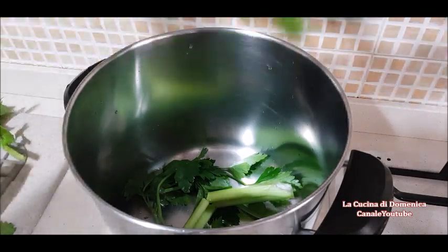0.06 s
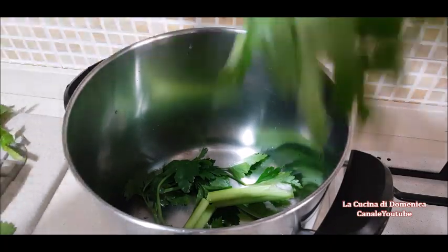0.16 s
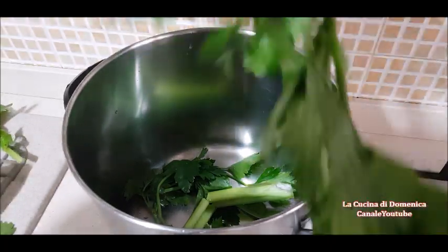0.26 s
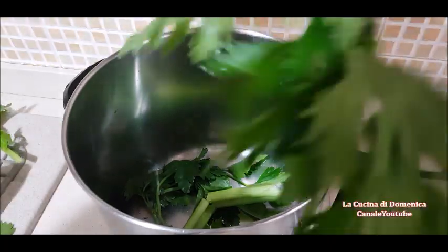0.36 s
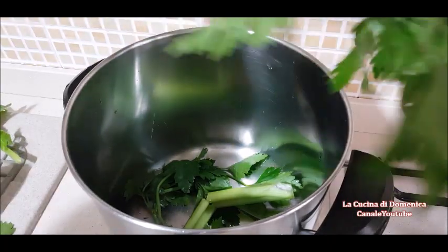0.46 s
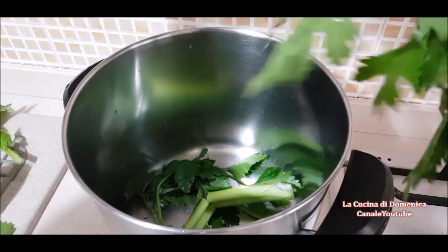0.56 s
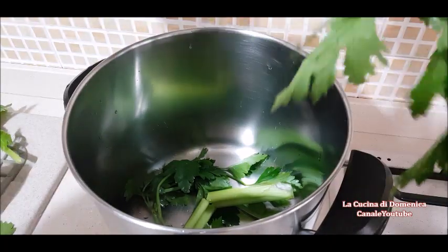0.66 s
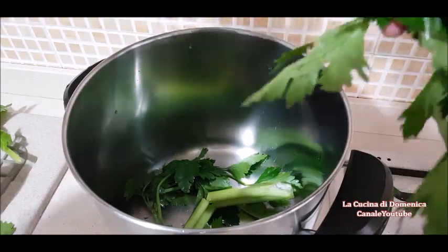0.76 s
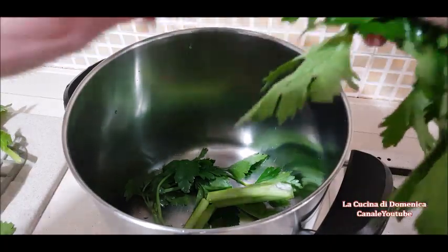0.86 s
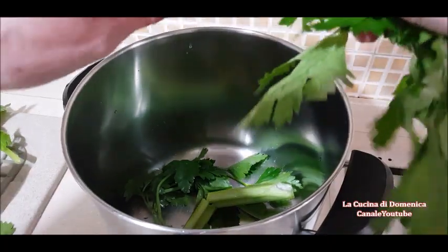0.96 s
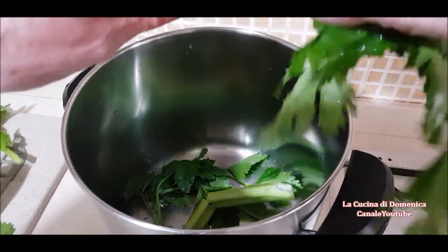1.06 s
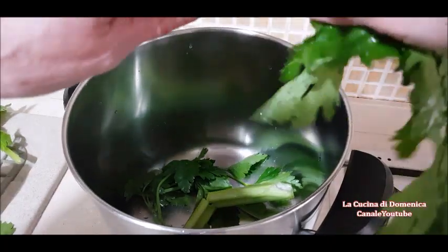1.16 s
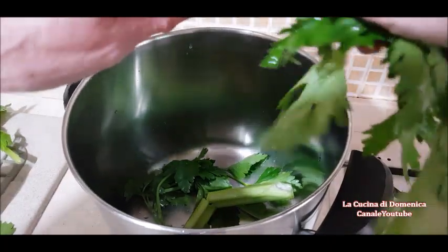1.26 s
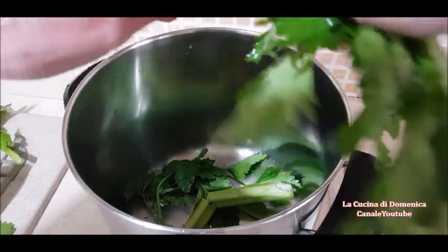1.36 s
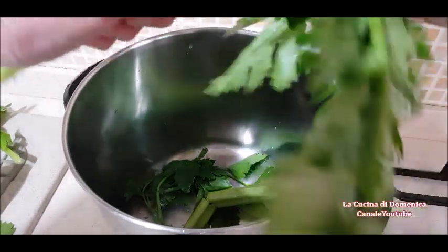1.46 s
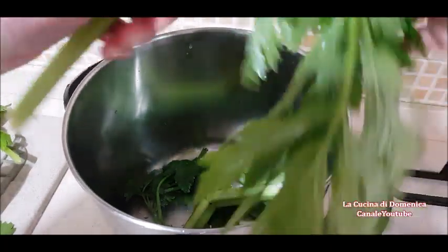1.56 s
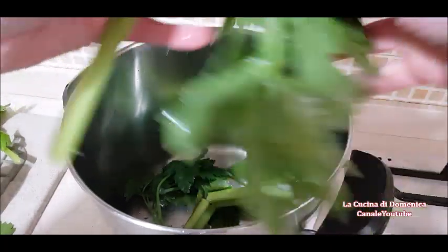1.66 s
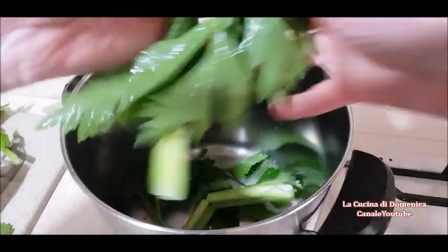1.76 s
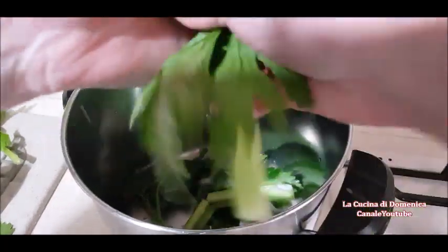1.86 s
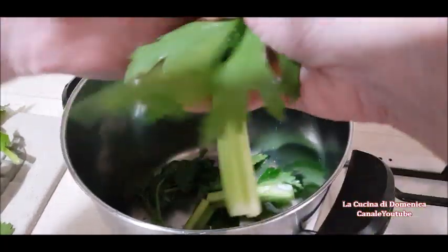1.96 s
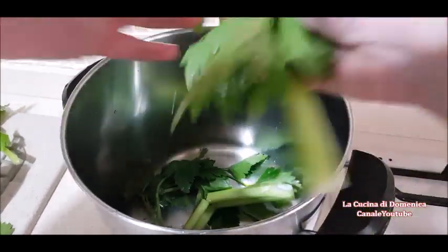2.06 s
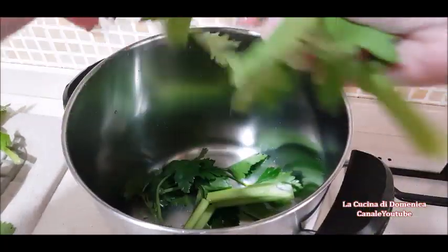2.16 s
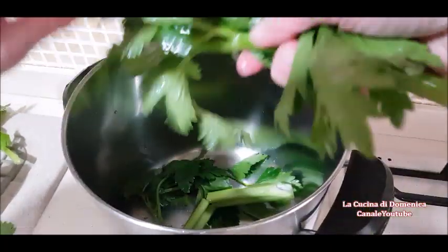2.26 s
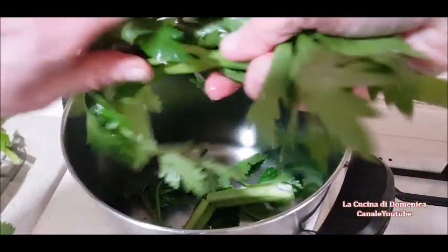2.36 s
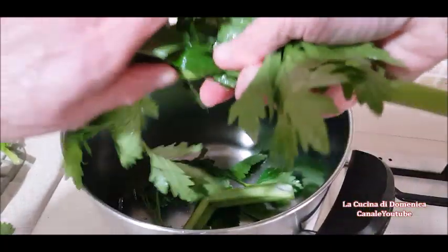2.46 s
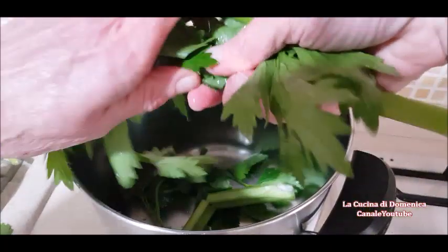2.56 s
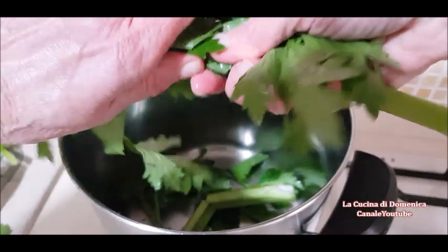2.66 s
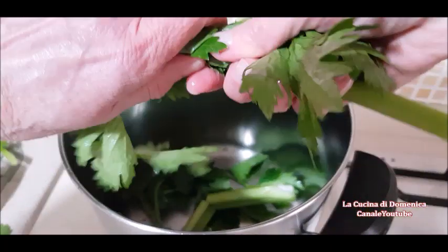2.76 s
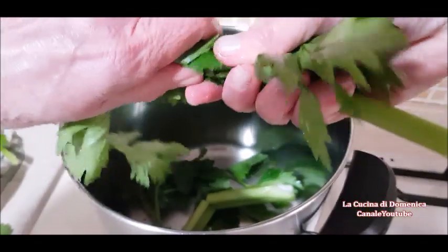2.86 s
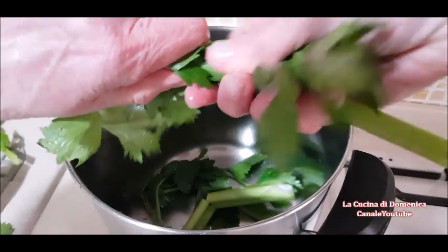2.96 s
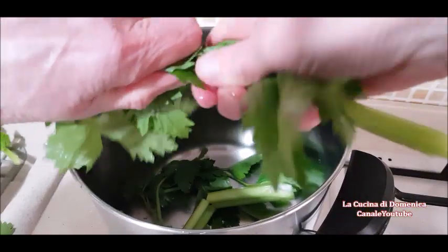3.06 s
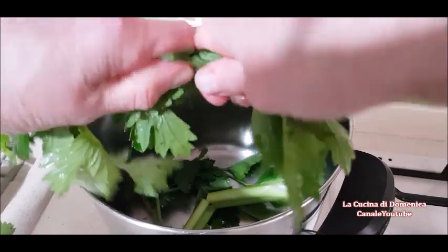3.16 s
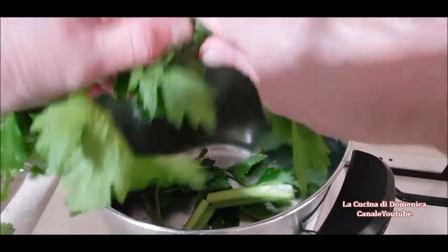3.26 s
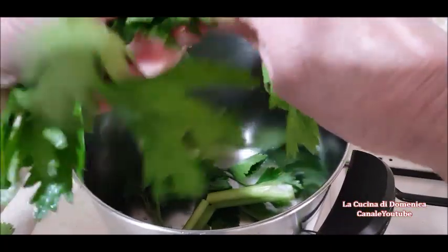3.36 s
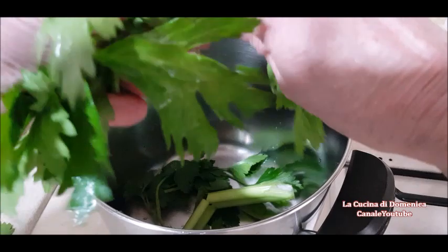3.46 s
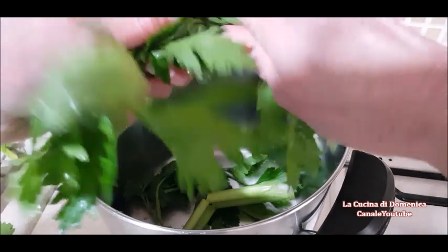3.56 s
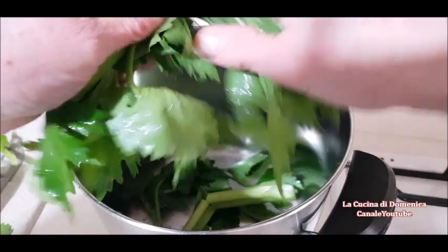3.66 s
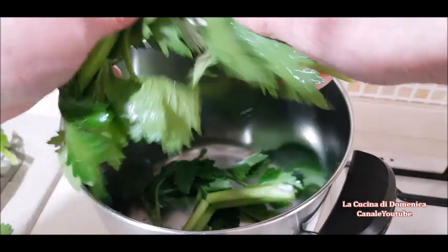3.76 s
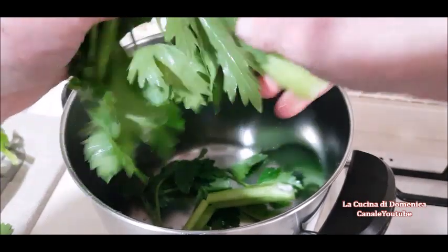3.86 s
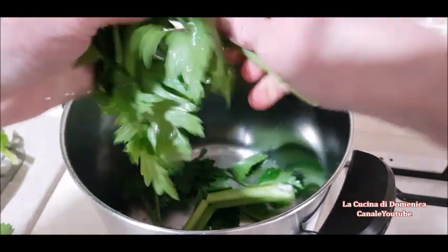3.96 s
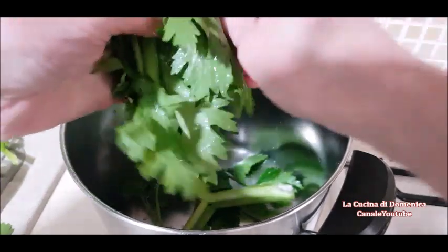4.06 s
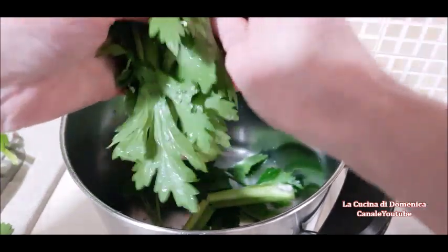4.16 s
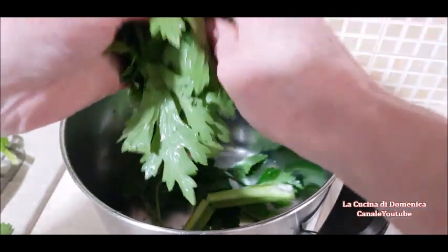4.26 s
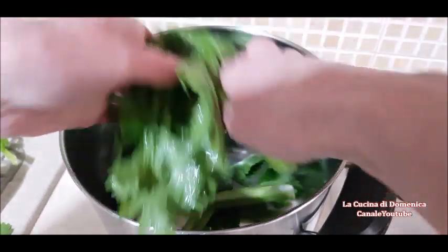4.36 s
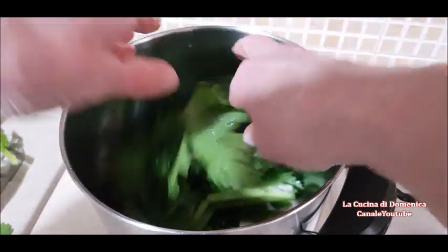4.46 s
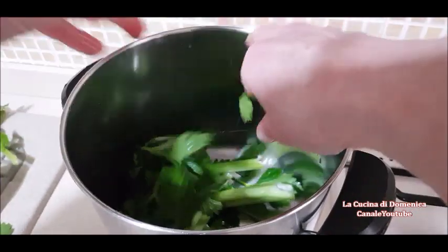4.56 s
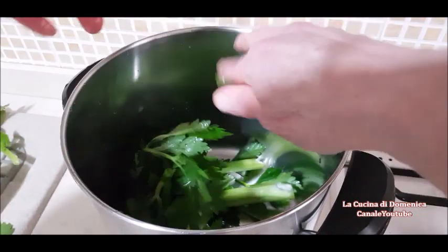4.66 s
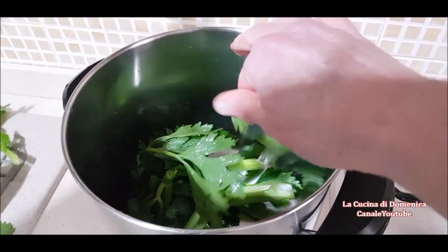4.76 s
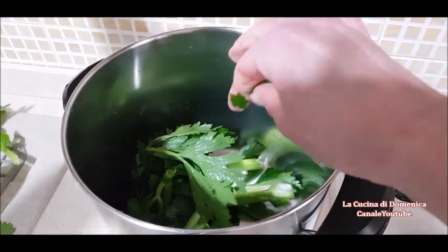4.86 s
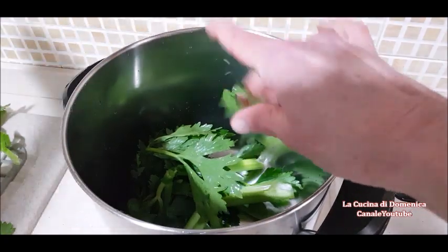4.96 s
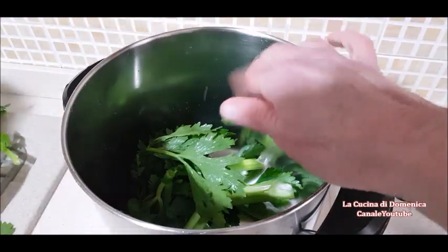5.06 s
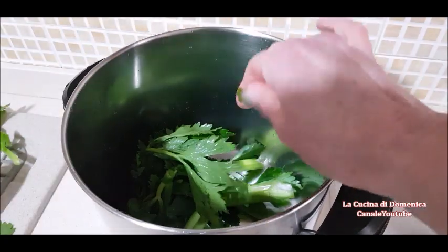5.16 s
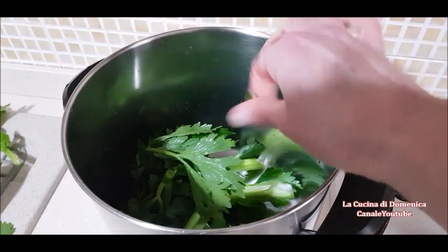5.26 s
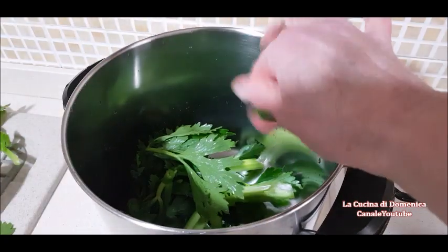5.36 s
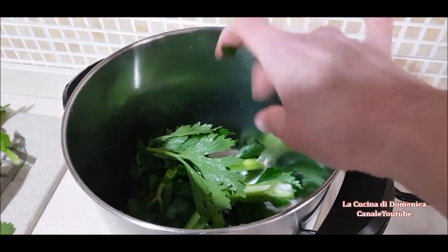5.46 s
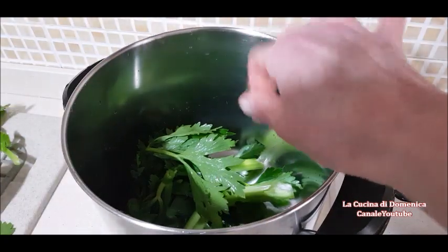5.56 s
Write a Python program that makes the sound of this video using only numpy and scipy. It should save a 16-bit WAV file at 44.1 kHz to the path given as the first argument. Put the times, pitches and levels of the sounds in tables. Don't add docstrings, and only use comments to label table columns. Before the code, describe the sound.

In a small tiled kitchen with a faint fridge hum, hands turn wet celery leaves with clumpy rustling, fizz and small ticks. A dense burst of crisp snaps and fibrous tearing follows, loudest around three seconds. A few last ticks, one sharp, lead to the bunch dropping into a steel pot with a soft, damped thud, then near quiet. Close stereo microphone.

```python
import sys
import numpy as np
from scipy import signal
from scipy.fft import rfft, irfft, next_fast_len
from scipy.io import wavfile
from scipy.ndimage import uniform_filter1d, map_coordinates

SR = 44100
rng = np.random.default_rng(int(sys.argv[2]) if len(sys.argv) > 2 else 0)


def to_wav(s):
    ch = np.atleast_2d(s).T
    pcm = np.round(np.clip(ch, -1, 1) * 32767)
    wavfile.write(sys.argv[1], SR, pcm.astype(np.int16))


def voltage_ratio(level):
    return 10 ** (np.asarray(level, float) / 20)


N = 247401


def unit(x):
    return x / np.sqrt(np.mean(x ** 2) + 1e-20)


def along(points, hz):
    f, v = np.transpose(points)
    return np.interp(np.log(hz + 1), np.log(f + 1), v)


def curves(rows):
    s, *cols = np.transpose(rows)
    return [np.interp(np.arange(N) / SR, s, c) for c in cols]


def wobble(rate):
    knots = rng.standard_normal(int(N * rate / SR) + 4)
    return map_coordinates(knots, [np.arange(N) * rate / SR])


def resonance(f, hz, width_hz):
    return 1j * f * width_hz / (hz * hz - f * f + 1j * f * width_hz)


# [f/Hz, left-right likeness]
LIKENESS = [(60, 0.7), (180, 0.9), (550, 0.57), (1650, 0.12), (4970, 0.0044), (15000, 0.066)]


def paired(x, gain):
    m = next_fast_len(N + 8192)
    hz = np.fft.rfftfreq(m, 1 / SR)
    turn = np.arccos(np.clip(along(LIKENESS, hz), -1, 1)) / 2
    mid, side = irfft(rfft(x, m) * gain(hz) * [np.cos(turn), np.sin(turn)], m)[:, :N]
    return unit(np.array([mid + side, mid - side]))


def strokes(rows):
    s, rise_s, fall_s, db, wet_db = np.transpose(rows)[:, :, None]
    still_db = -91
    t = np.arange(0, N + 64, 64) / SR
    level_db = db - 20 * np.maximum((s - t) / rise_s, (t - s) / fall_s)

    def total(d):
        power = voltage_ratio(2 * d).sum(axis=0) + voltage_ratio(2 * still_db)
        return np.interp(np.arange(N) / SR, t, 10 * np.log10(power))

    return total(level_db), total(level_db + wet_db)


# [t/s, level/dB]
HUM = [(0, -56), (.55, -52), (2.1, -53), (2.8, -51), (3.45, -53.5), (4.2, -53.5), (4.8, -53.5), (5.61, -52)]
# [f/Hz, level/dB per Hz]
ROOM_TONE = [(60, -25), (80, 12.5), (150, 3.5), (250, -6.5), (350, -1), (400, -5), (470, -7.5), (620, -8.5),
             (800, -22.5), (1000, -14.5), (1400, -55), (3000, -120)]
# [f/Hz, width/Hz, level/dB]
ROOM_MODES = [(134, 11, 5), (165, 4, 3), (251, 6.9, 9.5), (358, 13, 2.5), (466, 16, 15.5)]
# [f/Hz, level/dB per Hz]
DEEP = [(15, -16.5), (30, -11), (50, -2), (75, -4), (110, -46.5)]
# [f/Hz, level/dB per Hz]
HISS = [(700, -37), (1200, -10), (2400, -11.5), (4500, -15), (7400, -21), (11700, -9), (16000, -7.5)]


def fridge():
    hum_hz = 100.3
    effort_db = uniform_filter1d(strokes(list(TURNING) + list(PULLING))[0], size=20000)
    stir_db = effort_db + 60.0
    rumble_db = -57 + 0.054 * stir_db
    deep_db = -66.5 + 0.13 * stir_db
    hiss_db = -74.5

    def noise(gain):
        return paired(rng.standard_normal((2, N)), gain)

    def room_gain(f):
        modes = sum(voltage_ratio(db) * np.abs(resonance(f, hz, width_hz)) for hz, width_hz, db in ROOM_MODES)
        return voltage_ratio(along(ROOM_TONE, f)) * (1 + modes)

    phase = 2 * np.pi * hum_hz * np.arange(N) / SR + 1.82 * wobble(3)
    hum = np.sqrt(2) * voltage_ratio(curves(HUM)[0] + 0.45 * wobble(9.1)) * np.sin(phase)
    rumble = voltage_ratio(rumble_db + 0.5 + 0.2 * wobble(1.4)) * noise(room_gain)
    deep = voltage_ratio(deep_db + 1.5) * noise(lambda f: voltage_ratio(along(DEEP, f)))
    hiss = voltage_ratio(hiss_db + 1.5) * noise(lambda f: voltage_ratio(along(HISS, f)))
    return hum + rumble + deep + hiss


LANDING_S = [
    4.524,
    4.536,
    4.55,
    4.56,
    4.577,
    4.597,
    4.633,
    4.688,
]
# [level/dB, push length/s]
LANDING = [(-31.5, 0.003), (-34, 0.0025), (-26, 0.004), (-35, 0.007), (-37, 0.0024), (-24.5, 0.016),
           (-29, 0.016), (-39, 0.0104)]
# [f/Hz, level/dB, t60/s]
POT = [(79.2, -3.5, 0.39), (130, 7.5, 0.56), (200, -1, 0.17), (268.3, 2.5, 0.23), (373.5, 4, 0.28),
       (1031, -4.5, 0.1153)]
# [f/Hz, level/dB, t60/s]
POT_WALL = [(1640, -24, .016), (2090, -24, .014), (2500, -26, .012)]


def landing():
    t, grit = np.arange(N) / SR, rng.standard_normal(N)
    grit = grit - uniform_filter1d(grit, size=40)
    force = 0
    for s, (db, push_s) in zip(LANDING_S, LANDING):
        u = np.clip(t - s, 0, 1) / push_s
        bump = u * np.exp(1 - u)
        force = force + voltage_ratio(db) * bump * (1 + 0.45 * (0.0022 / push_s) ** 2 * grit)
    f = np.fft.rfftfreq(N, 1 / SR)
    modes = 0
    for k, (hz, db, t60) in enumerate(list(POT) + list(POT_WALL)):
        width_hz = np.log(1000) / np.pi / t60
        modes = modes + (-1) ** k * voltage_ratio(db) * resonance(f, hz, width_hz)
    radiation = (f / 100) / (1 + f / 1500)
    return voltage_ratio(12.0) * irfft(rfft(force) * modes * radiation, N)


def grainy(per_s, spread_db, share):
    sizes = (rng.random(N) < per_s / SR) * voltage_ratio(spread_db * np.minimum(rng.exponential(size=N), 3))
    decay = voltage_ratio(-60 * np.arange(400) / SR / .008)
    burst = np.convolve(sizes, decay)[:N]
    share = np.clip(share, 0, 1)
    return (np.sqrt(1 - share) + np.sqrt(share) * unit(burst)) * rng.standard_normal((2, N))


def patchy(x, depth_db):
    z = signal.stft(x, nperseg=256)[2]
    field = uniform_filter1d(rng.standard_normal(z.shape[1:]), size=5, axis=0)
    field = uniform_filter1d(field, size=10, axis=1)
    return signal.istft(z * voltage_ratio(depth_db * unit(field)), nperseg=256)[1][:, :N]


# [hardest t/s, rise/s, fall/s, effort level/dB, wetness/dB]
TURNING = [(.13, 0.041, 1.5, -68.5, 4.5), (.322, 0.14, 0.24, -58, 1), (.46, 0.29, 0.14, -65.5, 3),
           (.63, 0.37, 0.17, -67, 12), (.72, 0.18, 0.093, -70.5, 9), (.98, 0.1, 0.22, -72, 6.5),
           (1.137, 0.11, 0.27, -67.5, 7.5), (1.41, 0.018, 2.1, -64, 6), (1.57, 0.12, 0.58, -52.5, -1),
           (1.68, 0.53, 0.047, -79, 9), (1.78, 0.039, 0.044, -51, 2), (1.856, 0.05, 0.071, -51.5, 2.5),
           (1.918, 0.3, 0.014, -56, -1.5), (2.105, 0.26, 0.27, -59.5, 2), (2.432, 0.13, 0.14, -60, 6)]
# [t/s, rise/s, fall/s, level/dB, wetness/dB]
PULLING = [(2.52, 0.071, 0.33, -65, -1), (2.582, 0.037, 0.075, -53.5, -2.5),
           (2.68, 0.27, 0.18, -59.5, -13.5), (2.739, 0.084, 0.22, -47.5, 0), (2.806, 0.043, 0.22, -43, -1),
           (2.993, 0.069, 0.25, -41, -1.5), (3.045, 0.023, 0.19, -37, 3.5), (3.125, 0.044, .1, -37.5, 6),
           (3.163, 0.004, 0.03, -30, 6), (3.188, .02, 0.05, -31.5, 4), (3.214, .03, 0.22, -37, 10),
           (3.28, .1, 0.36, -48, 5), (3.33, 0.02, 0.091, -41.5, 1), (3.365, .03, .07, -44, 8),
           (3.4, .03, 0.09, -52, 2.5), (3.45, .01, .15, -59, 0.5), (3.66, .2, 0.43, -60.5, -4.5),
           (3.74, .15, .1, -54.5, 0), (3.82, 0.2, 0.23, -53, 2), (3.862, 0.046, 0.22, -50, -1.5),
           (4.086, 0.27, 0.22, -68, 6.5)]
# [t/s, rise/s, fall/s, level/dB, wetness/dB]
LETTING_GO = [
    (4.355, 0.011, 0.36, -58, 0),
    (4.435, 0.093, 0.063, -52.5, -1.5),
    (4.518, 0.025, 0.15, -48.5, -1.5),
    (4.55, 0.059, 0.055, -39, -2),
]
# [t/s, rise/s, fall/s, level/dB, wetness/dB]
SETTLING = [
    (4.64, .1, 0.12, -68, -5),
    (5.271, .03, .06, -70, 9),
]
# [t/s, level/dB]
OVER_POT = [(0, -7), (.84, -11), (1.3, -18.5), (1.78, -7.5), (2.4, -11.5), (2.65, 4), (2.8, -6), (3.2, -12),
            (3.36, -3), (3.8, -10.5), (4.55, -14), (4.66, -2), (5.3, 6)]
# [t/s, level/dB]
CUPPED = [(0, 15.5), (.25, -19.5), (.6, -0.5), (.8, -8), (1.15, -1), (1.45, -5.5), (1.58, -11.5),
          (1.75, -11), (1.9, -13.5), (2.2, -12), (2.58, -10), (2.65, -19.5), (2.82, -15), (3.05, -20),
          (3.3, -11.5), (3.75, -25), (4.1, -9), (4.6, -15)]
# [f/Hz, level/dB per Hz]
LEAF = [(590, -38.5), (1000, -3), (1720, -1.5), (2250, 3), (3050, 2), (4060, 2), (6380, -7), (8000, -8),
        (10400, -42), (17600, -120)]
# [f/Hz, level/dB per Hz]
FIZZ = [(4000, -23.5), (6000, -5), (7000, -4.5), (8500, 1.5), (12600, 1.5), (15200, -6.5), (17000, 0.5)]
# [f/Hz, width/Hz, level/dB]
POT_AIR = [(593, 150, 8), (1051, 90, 13), (1470, 120, -2.5), (1980, 680, 5)]


def leaves():
    cup_hz, cup_width_hz = 4780, 2500
    rustle_db, fizz_db = strokes(list(TURNING) + list(PULLING) + list(LETTING_GO) + list(SETTLING))
    air_db = rustle_db + curves(OVER_POT)[0]
    cup_db = rustle_db + curves(CUPPED)[0]
    clump = wobble(35)
    strain = np.clip((strokes(PULLING)[0] + 52) / 12, 0, 1)
    rub = patchy(grainy(350, spread_db=3.5, share=.33 - .23 * strain), depth_db=2.0)
    fine = patchy(grainy(450, spread_db=3.5, share=.33 - .21 * strain), depth_db=3)

    def air_gain(f):
        modes = sum((-1) ** k * voltage_ratio(db) * resonance(f, hz, width_hz)
                    for k, (hz, width_hz, db) in enumerate(POT_AIR))
        return modes * resonance(f, 930, 1500)

    cup = paired(rub, lambda f: resonance(f, cup_hz, cup_width_hz) ** 2)
    rustle = paired(rub, lambda f: voltage_ratio(along(LEAF, f)))
    rustle = unit(voltage_ratio(0.88 * clump + 0.43 * wobble(15)) * rustle)
    fizz = paired(1.4 * rub + 0.35 * fine, lambda f: voltage_ratio(along(FIZZ, f)))
    fizz = unit(voltage_ratio(1.0 * clump + 0.81 * wobble(25)) * fizz)
    air = paired(rub, air_gain)
    rubbing = voltage_ratio(rustle_db - 4.0) * rustle + voltage_ratio(fizz_db - 1.5) * fizz
    return rubbing + voltage_ratio(air_db - 5.5) * air + voltage_ratio(cup_db) * cup


# [f/Hz, t60/s]
KITCHEN = [(500, 0.68), (3000, 0.11), (12000, 0.04)]


def kitchen(count):
    hz, t, z = signal.stft(rng.standard_normal((count, 2, 8192)), SR, nperseg=256)
    fade = voltage_ratio(-60 * t / along(KITCHEN, hz)[:, None])
    tail = signal.istft(z * fade, SR, nperseg=256)[1]
    return tail / np.linalg.norm(tail, axis=2, keepdims=True)


def breaks(rows, t60_ms, usual_db, quicker):
    s, db, thick_db, crisp_db, pan_db = np.transpose(rows)
    peak_db = db + np.maximum(crisp_db, 0)
    decay_ms = t60_ms * voltage_ratio(quicker * (usual_db - peak_db))
    return np.transpose([s, db + thick_db, db, db + crisp_db, pan_db, decay_ms])


PEEL_MS = 55


def cracks(rows, bands, scatter_s, scatter_db, room_db, lag):
    s, low_db, middle_db, high_db, pan_db, t60_ms = np.transpose(rows)[:, :, None, None]
    t, f = np.arange(2048) / SR, np.fft.rfftfreq(4096, 1 / SR)
    noise = rng.standard_normal((len(rows), 3, len(t)))
    place = rng.uniform(-1, 1, (len(rows), 3))[:, :, None, None]
    shared = noise[:, :1] * .8 + noise[:, 1:] * .6
    shape = voltage_ratio(-60 * t / (t60_ms * .0004)) + voltage_ratio(scatter_db - 60 * t / scatter_s)
    peels = np.isclose(t60_ms, PEEL_MS)
    rise_s = np.where(peels, .0015, .0001)
    wave = shared * shape * (1 - np.exp(-t / rise_s))
    wave[..., 3] += 3.5 * np.sign(noise[:, :1, 0]) * ~peels[..., 0]
    burst = rfft(wave, 4096)
    burst /= np.sqrt(uniform_filter1d(np.abs(burst) ** 2, size=70, axis=2))
    low_hz = 2050 * 2 ** (-np.clip(low_db - middle_db, -3, 8) / 14)
    layers = [(low_db, low_hz, 1400), (middle_db, *bands[0]), (high_db, *bands[1])]
    dry = 0
    for k, (db, hz, width_hz) in enumerate(layers):
        ring_hz = hz * 1.08 ** place[:, k]
        body = resonance(f, hz, width_hz)
        ring = resonance(f, ring_hz, ring_hz * .25)
        band = irfft(burst * body * (body + .5 * ring))[..., :len(t)]
        dry = dry + voltage_ratio(db) * band / np.abs(band).max(axis=2, keepdims=True)
    dry *= voltage_ratio(-2.0 + pan_db * [[.5], [-.5]])
    wet = voltage_ratio(room_db) * signal.fftconvolve(dry, kitchen(count=len(rows)), axes=2)
    out = np.zeros((2, N + SR))
    for start, near, far in zip(np.round(s.ravel() * SR).astype(int), dry, wet):
        out[0, start + lag:][:len(t)] += near[0]
        out[1, start:][:len(t)] += near[1]
        out[:, start + 130:start + 130 + far.shape[1]] += far
    return out[:, :N]


# [t/s, level/dB, thickness/dB, crispness/dB, left-right/dB]
TICKS = [(.1206, -44, -7.5, 0, -5.5), (.563, -40.5, -15, 1, -3), (.6341, -44, -34, 5.5, 5),
         (.6512, -51.5, -30, 12, -5.5), (.7047, -40, -23, 2, -5.5), (.7498, -53, -30, 9.5, 1.5),
         (.8516, -61, -12, 10.5, 5), (.8925, -46, -38, 11, -2.5), (.9707, -41.5, -21, -25, -8.5),
         (.9735, -51, -20, 14.5, -1), (1.1252, -46, -18, -10, -1), (1.0939, -47, -22, 11, -4.5),
         (1.1366, -51.5, -22, 7.5, -8.5), (1.4805, -48, -17, -3, -5), (1.6863, -59.5, -7, 7, 2.5),
         (1.8425, -45.5, -17, 11, -5), (2.0007, -41.5, -23, -7, 4), (2.2229, -45.5, -9, -9.5, 8),
         (2.3041, -50.5, -26, 3, 0.5), (2.3327, -33, -22, 2, -4.5), (2.4416, -50.5, -19, 11, -2),
         (2.5744, -37.5, -20, 2, -1)]
# [t/s, level/dB, thickness/dB, crispness/dB, left-right/dB]
LAST_TICKS = [(3.521, -35.5, -26, -0.5, 0.5), (3.6482, -57.5, 5.5, 24.5, 2), (3.7724, -52.5, 0, 6, -4),
              (3.7918, -35, -18, 9.5, -2), (3.8455, -16.5, -27, -3, 0.5), (3.9478, -37, -24, 4.5, 0),
              (4.1073, -53.5, -2, 11.5, 1), (4.1712, -54.5, -18, 5.5, 4.5), (4.9754, -73.5, 7.5, 28, 4.5)]
# [t/s, level/dB, thickness/dB, crispness/dB, left-right/dB]
CREASES = [(.3343, -50, -5, -0.5, -2), (.3908, -47, -3, -6, 1), (.4138, -61, 2, 11, -3),
           (.5082, -57, -1, 16, -1), (.5683, -69.5, -17, 0.5, -7), (.5772, -54, -9, 10, 0.5),
           (.6146, -58, -9, 4, -4), (.6943, -63, -13, 12.5, -2), (.9813, -46, -6, 0, 8),
           (1.1439, -56, -22, -1.5, -2), (1.2118, -72.5, -17, -2, -3), (1.3999, -67, -3, 13, -5),
           (1.4286, -57, -22, -7, -1), (1.8385, -48.5, -10, 2, -1), (1.908, -47.5, -9, 2, 1),
           (2.0712, -55.5, -6, 5.5, -0.5), (2.1482, -54, -9, 14.5, 6), (2.2061, -58, -13, 6.5, -3),
           (2.4238, -48, -13, 6.5, -3), (2.5563, -50, -9, 3, 0), (2.6132, -44, -2, -3, 4),
           (3.66, -41, -3, -4, 2.5), (3.7407, -43, -12, -0.5, 3.5), (3.7598, -43.5, -7, -1, -1),
           (3.9319, -52.5, -11, 5.5, -4), (4.1945, -50, -10, -2.5, 2)]
# [t/s, level/dB, thickness/dB, crispness/dB, left-right/dB]
FLICKS = [(.108, -44, -18, -12, 0), (1.775, -42, -5.5, 2, 0), (3.6197, -43, -2, -6, 2.5),
          (4.0712, -48, -21, 5.5, -1.5), (4.487, -48, -21.5, 3, -1.5), (5.1732, -59, -12.5, 5.5, 1.5),
          (5.26, -62, -19, 14.5, 8), (5.276, -71, -15.5, 18, 1.5)]
# [f/Hz, width/Hz]
LEAF_BANDS = [(4800, 3750), (9800, 7600)]


def leaf_ticks():
    crisp = list(TICKS) + list(LAST_TICKS) + list(CREASES)
    rows = np.vstack([breaks(crisp, t60_ms=16, usual_db=-42, quicker=0.058),
                      breaks(FLICKS, t60_ms=100, usual_db=0, quicker=0)])
    return cracks(rows, LEAF_BANDS, scatter_s=.04, scatter_db=-17, room_db=-12, lag=3)


# [t/s, f/Hz, level/dB, t60/s]
HOLLOW = [(2.7902, 2090, -26, 0.028), (3.0368, 1710, -24.5, 0.032), (3.0362, 1380, -28.5, 0.03),
          (3.0378, 2034, -31, .03), (3.0378, 2830, -25, 0.017), (3.1558, 1760, -26, 0.066),
          (3.1968, 2515, -25, .03), (3.3257, 1010, -28.5, 0.017), (3.351, 1040, -20, 0.0091),
          (3.552, 1790, -47, 0.026), (3.791, 1740, -46, 0.026), (3.8464, 1050, -37, 0.014),
          (3.8452, 2420, -31.5, 0.025)]


def hollow():
    soft_s, left_lag, left_db = .0006, 6, -2
    out, t = np.zeros((2, N + SR)), np.arange(4096) / SR
    for s, hz, db, t60 in HOLLOW:
        drift = 0.074 * np.cumsum(rng.standard_normal((2, len(t))), axis=1)
        envelope = voltage_ratio(db - 60 * t / t60) * (1 - np.exp(-t / soft_s))
        ring = envelope * np.sin(2 * np.pi * hz * t + drift)
        start = round(s * SR)
        out[0, start + left_lag:][:len(t)] += voltage_ratio(left_db) * ring[0]
        out[1, start:][:len(t)] += ring[1]
    return out[:, :N]


# [t/s, level/dB, thickness/dB, crispness/dB, left-right/dB]
FIBRES = [(2.7305, -36, -6, 0.5, -1.5), (2.7335, -32, -2, 1, -2), (2.7908, -14, -24, -1, -6.5),
          (2.9104, -42.5, -3, 5.5, 2.5), (2.9317, -27, -11.5, 4, 0), (2.9934, -27, -14, 2, 0),
          (3.0376, -10.5, -1.5, -5, -0.5), (3.0657, -29.5, -4, 4.5, -5), (3.0778, -18, -14.5, 3.5, 0),
          (3.1049, -31.5, -4, 4.5, -1), (3.1272, -21.5, -10.5, 2.5, -2.5), (3.1582, -8.5, -12.5, 2.5, 5.5),
          (3.1598, -16.5, -3.5, -1.5, -2), (3.1615, -23.5, -5, -1.5, 1), (3.1651, -16, -14, 5.5, -2),
          (3.1751, -13, -19, 11, -8), (3.1985, -12, -18.5, -0.5, 0), (3.2047, -25.5, -16, 5.5, 0.5),
          (3.2056, -14, -26, 8.5, 6.5), (3.2258, -20, -15.5, 1.5, -6.5), (3.2372, -23, -18.5, 5.5, -1.5),
          (3.2593, -32, -11, 10, -2), (3.3075, -40, -6, 10, -3), (3.3206, -19.5, -20.5, 3, -5.5),
          (3.3253, -16.5, -12, 7, 4.5), (3.3501, -14, -27, -0.5, -9.5), (3.3579, -22, -18.5, 13, 1.5),
          (3.3592, -27, -14.5, 11.5, 3), (3.3668, -33, -14, 12, -0.5), (3.4428, -32.5, -5.5, 8, 4)]
# [t/s, level/dB, thickness/dB, crispness/dB, left-right/dB]
STRINGS = [(2.8762, -41.5, -1, 2.5, 4.5), (2.9765, -30.5, -13, 4.5, 0.5), (3.0037, -34, -2.5, -12.5, -11),
           (3.1184, -26, -13, -14.5, -8), (3.2745, -29, -13, 8.5, -6.5), (3.3225, -23, -16, 5, 3),
           (3.344, -25, -18.5, 6, 5.5), (3.3875, -24.5, -28, 8.5, 3), (2.838, -34, -5.5, -4, -1.5),
           (3.4225, -31, -7, -12.5, 1)]
# [t/s, level/dB, thickness/dB, crispness/dB, left-right/dB]
SPLINTERS = [(2.6962, -43, 0, -2.5, 8.5), (2.7107, -45.5, 3, 1, -1), (2.7227, -42, -2, 1.5, -3.5),
             (2.748, -37.5, -4, 1.5, -3), (2.7536, -38, 7, -2, -0.5), (2.7668, -34.5, -6, 1, -4),
             (2.7943, -27, -18, 5, 3.5), (2.8268, -36.5, -18, 3, -3), (2.9502, -46.5, -8.5, -2, -2),
             (2.9839, -38.5, -7.5, 9.5, 0.5), (2.9971, -36, -4.5, 4, 2), (3.0184, -37, 0.5, 1, -3),
             (3.0226, -36, 3, 1.5, -3), (3.0438, -30.5, -6.5, -1, 1.5), (3.0567, -35.5, -7.5, 4, -2),
             (3.1395, -31.5, -1.5, 9, 2), (3.1441, -34.5, 2.5, 7.5, 3), (3.1869, -25, -14, 3.5, -3),
             (3.1927, -28, -14.5, 4.5, -9), (3.2165, -24, -11.5, 3.5, -1.5), (3.2314, -33.5, -9.5, 6, 2),
             (3.2666, -36.5, -11, 6.5, -4), (3.2874, -37, -10.5, 10.5, -2), (3.2934, -39, -8.5, 7.5, -0.5),
             (3.3785, -41.5, -8.5, 6.5, -0.5), (3.393, -35, -12, 6, 0.5), (3.3995, -43.5, -12, 6, 0.5)]
# [t/s, f/Hz]
SKIN = [(2.79, 9800), (2.93, 12000), (3.038, 9500), (3.078, 10500), (3.128, 12500), (3.158, 13000),
        (3.165, 12500), (3.175, 11000), (3.1985, 9500), (3.2056, 10500), (3.2165, 9000), (3.226, 11500),
        (3.32, 11500), (3.3255, 10000), (3.358, 10500), (3.388, 8800), (3.4435, 10500)]


def stalk():
    rows = np.vstack([breaks(FIBRES, t60_ms=26, usual_db=-20, quicker=.4),
                      breaks(STRINGS, PEEL_MS, usual_db=0, quicker=0),
                      breaks(SPLINTERS, t60_ms=26, usual_db=0, quicker=0)])
    skin_hz = np.interp(rows[:, 0], *np.transpose(SKIN))[:, None, None]
    bands = [(3830, 3400), (skin_hz, 5400)]
    return cracks(rows, bands, scatter_s=.03, scatter_db=-20, room_db=-15, lag=6)


def scene():
    return fridge() + landing() + leaves() + leaf_ticks() + hollow() + stalk()


def low_pass(x):
    return signal.sosfilt(signal.butter(12, 16660, fs=SR, output="sos"), x)


PORTS_DB = [
    [2],
    [3],
]


def record(dry):
    top_hz, ceiling_hz = 15800, 16660
    x = np.clip(dry * voltage_ratio(PORTS_DB), -1, 1)
    m = next_fast_len(N)
    spectrum, hz = rfft(x, m), np.fft.rfftfreq(m, 1 / SR)
    top = irfft(spectrum * (hz > top_hz), m)[:, :N]
    over = irfft(spectrum * (hz > ceiling_hz), m)[:, :N]
    power = (top ** 2).sum(axis=0)
    sudden = uniform_filter1d(power, size=60) > 14 * uniform_filter1d(power, size=2000)
    keep = np.clip(8 * uniform_filter1d(1. * sudden, size=256), 0, 1)
    return low_pass(x - top + .4 * keep * (top - over))


dry = scene()
out = record(dry)
to_wav(out)
```